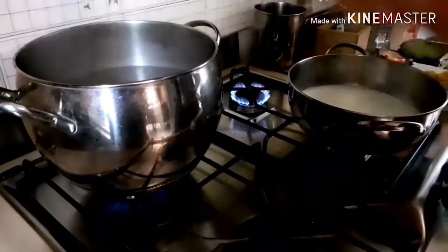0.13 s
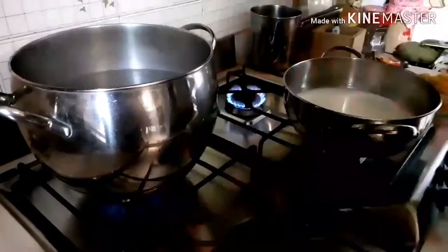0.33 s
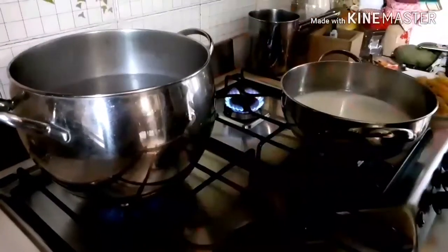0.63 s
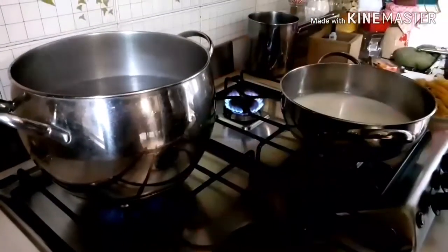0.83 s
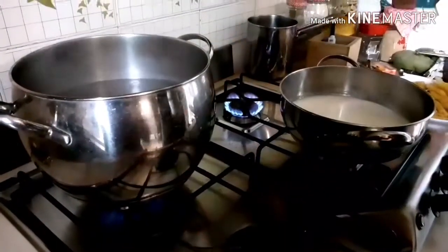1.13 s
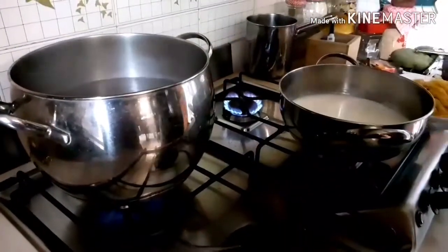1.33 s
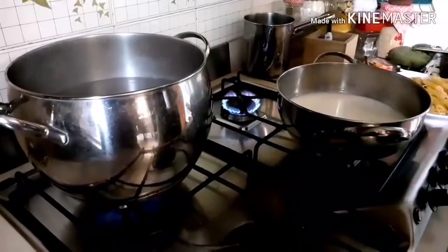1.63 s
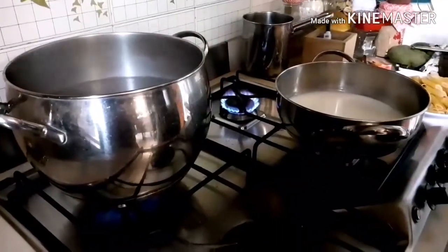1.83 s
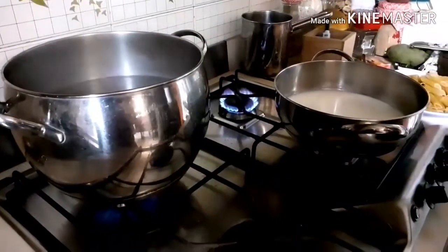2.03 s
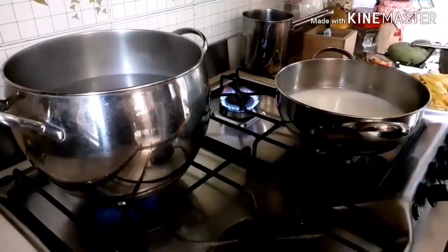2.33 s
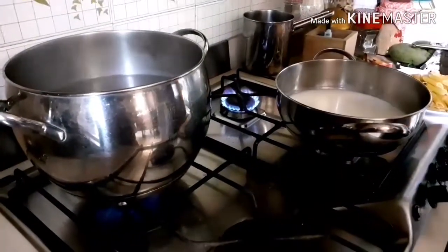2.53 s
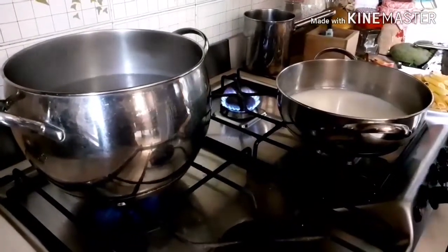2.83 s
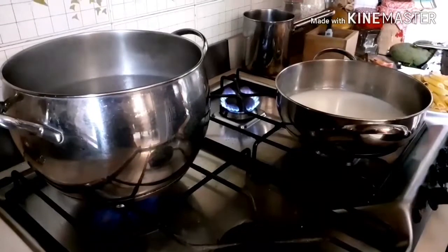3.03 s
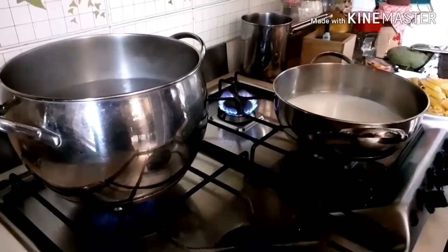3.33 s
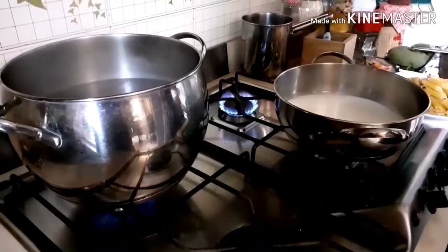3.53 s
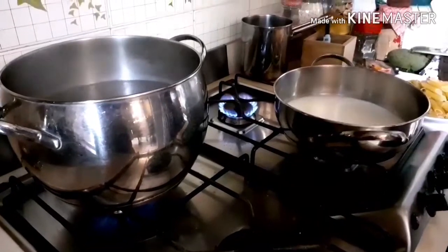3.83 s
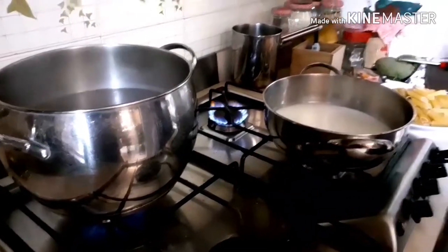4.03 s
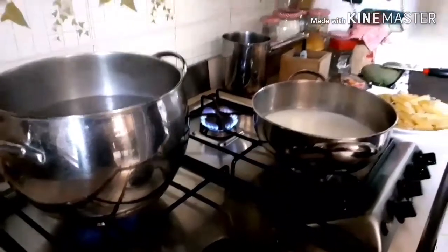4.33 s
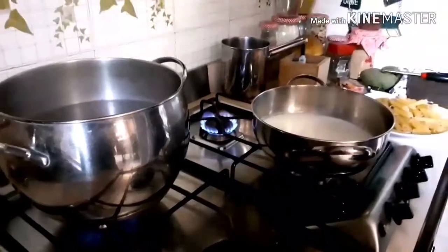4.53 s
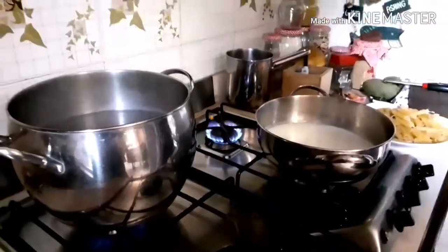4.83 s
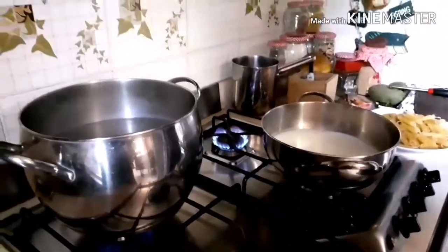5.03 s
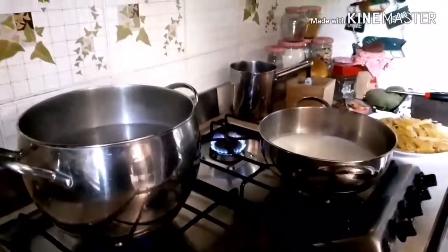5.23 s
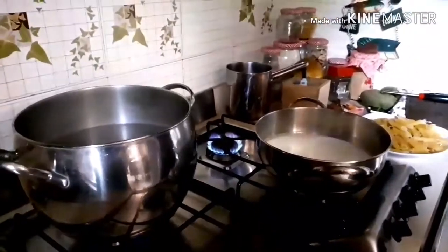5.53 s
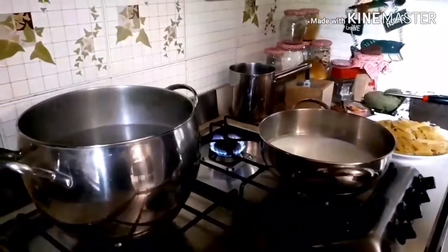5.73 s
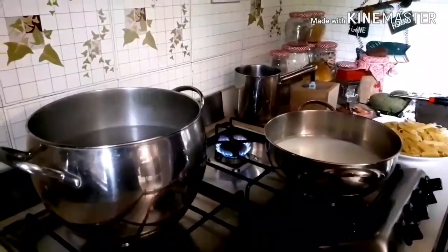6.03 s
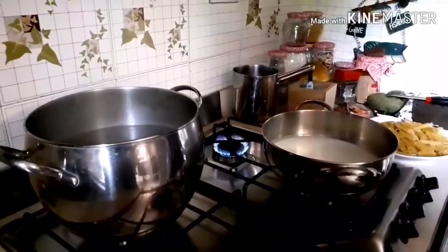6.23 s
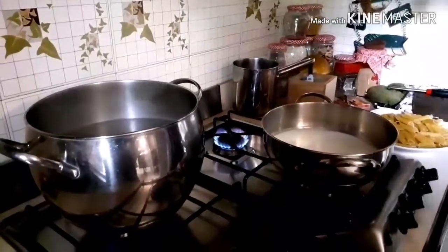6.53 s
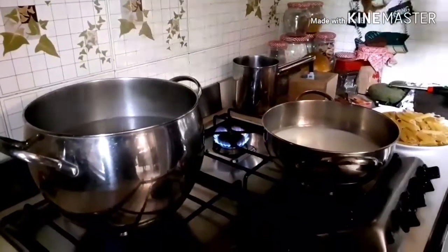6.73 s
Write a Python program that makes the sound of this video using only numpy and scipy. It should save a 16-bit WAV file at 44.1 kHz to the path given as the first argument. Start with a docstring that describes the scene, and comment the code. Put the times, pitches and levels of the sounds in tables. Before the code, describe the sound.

Gas burners softly rumble and hiss in a small kitchen, with sharp metal pot knocks, brief scrapes and dull cupboard thuds.

```python
"""A steel pot on a kitchen worktop, knocked by a utensil: each blow rings its modes over a dry clack.
A cupboard thuds, something slides briefly with gritty friction, and there is one small click.
Gas burners rumble and hiss throughout, once with a faint whistle. The small tiled room reflects
the knocks and slides; two close microphone ports hear it all."""
import sys
import numpy as np
from scipy import signal
from scipy.fft import rfft, irfft, next_fast_len
from scipy.io import wavfile
from scipy.ndimage import uniform_filter1d, map_coordinates

SR = 44100
rng = np.random.default_rng(int(sys.argv[2]) if len(sys.argv) > 2 else 0)


def log_audio(samples):
    """Write samples as a 16-bit WAV file to the path given in sys.argv[1]."""
    # one column per channel
    frames = np.atleast_2d(samples).T
    # limit to full scale, then quantise
    limited = np.clip(frames, -1, 1)
    pcm = np.round(limited * 32767).astype(np.int16)
    wavfile.write(sys.argv[1], SR, pcm)


N = 303182

# Utensil blows: (time [s], base [dB], wall [dB], rim [dB], shoulder [dB], lip [dB], handle [dB],
# contact [ms], damping [x], left minus right [dB])
POT_BLOWS = [(1.901, -31, -42.5, -23.5, -81, -83, -83, 0.62, 71, -1),
             (2.166, -56, -73, -22, -42, -43, -46, 2, 0.57, -6.5),
             (2.176, -53, -79, -28.5, -37, -44, -37, 3.2, 1.3, 16),
             (2.181, -30, -20.5, -50, -33, -52, -36, 2.2, 2.3, -3),
             (2.583, -29.5, -23, -31, -26.5, -28.5, -28, 1.02, 1.15, -2),
             (2.596, -20.5, -29, -22, -44, -46, -42, 3.4, 6.4, 6),
             (2.695, -27.5, -40, -29, -30, -34, -36, 1.4, 10.6, 0),
             (2.71, -36, -39, -38, -40, -38, -45, 1.4, 3.9, 1),
             (3.457, -50.5, -56, -52, -56, -62, -68, 0.82, 3.3, -1),
             (3.731, -29, -25, -43, -58, -69, -73, 3, 6, -1),
             (3.748, -38, -47, -61, -66, -70, -77, 1.4, 5.1, -1),
             (3.852, -51, -35, -29, -24, -24.5, -37, 1.1, 3.2, 1.5),
             (3.890, -22, -22.5, -22.5, -26.5, -21, -37, 2.1, 1.4, 0),
             (3.893, -11.5, -31.5, -13.5, -42, -27, -21, 5, 4.8, -0.5),
             (3.9038, -21.5, -47, -42, -50, -45, -55, 3.2, 1.9, 1.5),
             (3.965, -32, -65, -71, -68, -66, -70, 3.7, 1.9, 4),
             (3.982, -28.5, -58, -69, -73, -70, -68, 3, 2.2, 2),
             (4.471, -50, -51, -41, -55, -50, -55, 4, 1.6, 6)]
# Where base, wall, rim, shoulder, lip and handle ring: (frequency [Hz])
POT_BANDS_HZ = [400, 700, 1850, 2800, 3700, 5600]
# Pot modes: (frequency [Hz], gain [dB], t60 [s])
POT_MODES = [(300, -8, .1), (340, -8, .15), (370, 1, .35), (390, 0, .12), (430, -7, .25), (538, -8, .2),
             (700, -4, .12), (840, -2, .2), (950, -4, .15), (1035, -4, .2), (1170, -2, .2),
             (1635, -12, .12), (1811, -2, .25), (1868, -3, .22), (2030, -14, .15), (2400, -12, .05),
             (2810, -4, .1), (3000, -6, .05), (3240, -5, .05), (3460, -6, .04), (3680, -4, .05),
             (3770, -1, .12), (3880, -4, .1), (4250, -20, .05), (4850, -18, .07), (5570, -6, .1)]


def pot():
    """A utensil rings the steel pot; the contact drains most of the ring at once."""
    return struck(POT_BLOWS, POT_MODES, POT_BANDS_HZ, left_lag_ms=0.31, scatter_db=3, tail_db=-40,
                  drain_s=0.0093, clack_db=-10, clack_t60_s=0.059, treble_db_oct=6, bass_db_oct=22.5)


def struck(blows, modes, bands_hz, left_lag_ms, scatter_db, tail_db, drain_s,
           clack_db, clack_t60_s, treble_db_oct, bass_db_oct):
    """Each blow rings the modes, weighted by where it lands, over the clack of the surface beneath."""
    # Dents and joints split each mode into a cluster, wider in the treble.
    twins = [(f * 1.006, db - 6, t60 * 0.8) for f, db, t60 in modes]
    outer = [(f * (1 + way * f / 2e5), db - 9, t60 * .5) for f, db, t60 in modes for way in (-1, 1)]
    hz, mode_db, t60_s = np.transpose(modes + twins + outer)[:, :, None]
    # The surface has dense, dead modes that differ from spot to spot.
    dead_hz = np.geomspace(200, 14000, num=120)[:, None]
    dead_db = clack_db - treble_db_oct * np.maximum(np.log2(dead_hz / bands_hz[-1]), 0)
    dead_db -= bass_db_oct * np.maximum(np.log2(bands_hz[1] / dead_hz), 0)
    dead_t60_s = clack_t60_s * (1000 / dead_hz) ** 0.55
    t = np.arange(SR // 5) / SR
    side = np.array([1, -1])[:, None, None]

    def port_phase(f):
        """A plain lag in the bass; ports under a third of a turn apart in the treble."""
        return -side * .3 * np.pi * np.tanh(f * left_lag_ms / 300)

    def band_gain(f, band_db):
        return np.interp(np.log(f), np.log(bands_hz), band_db)

    out = np.zeros((2, N + SR))
    for start_s, *band_db, contact_ms, damping, pan_db in blows:
        draws = rng.standard_normal((4, len(dead_hz), 1))
        scatter, phase, _, detune = draws[:, :len(hz)]
        dead_phase, dead_detune = draws[2:]
        blow_hz = hz * (1 + (.0015 + hz / 2e6) * detune)
        blow_db = mode_db + band_gain(hz, band_db) + scatter_db * scatter
        phase = np.minimum(hz / 1200, 1) * phase  # low modes start in step with the push
        sound = ring(blow_hz, blow_db, t60_s / max(damping, .5), phase + port_phase(hz), len(t))
        # The contact drains the ring to a quieter tail.
        sound *= undb(tail_db) + (1 - undb(tail_db)) * np.exp(-(t / drain_s) ** 2 / contact_ms)
        clack = ring(dead_hz * (1 + 0.0394 * dead_detune), dead_db + band_gain(dead_hz, band_db),
                     dead_t60_s, 2 * dead_phase + port_phase(dead_hz), SR // 6)
        sound[:, :SR // 6] += clack
        push = 1 - np.exp(-1000 * t / contact_ms)
        at = int(start_s * SR)
        out[:, at:at + len(t)] += undb(side[:, 0] * pan_db / 2) * push * sound
    return out[:, :N]


def ring(hz, db, t60_s, phase, size):
    """Decaying sines summed over the modes; one row of phases per port."""
    step = np.exp((2j * np.pi * hz - np.log(1000) / t60_s) / SR)
    onset = (undb(db) * np.exp(1j * phase))[..., 0]
    return (onset @ np.cumprod(np.repeat(step, size, axis=1), axis=1)).imag


# Cupboard blows: (time [s], boom [dB], panel [dB], knock [dB], edge [dB], contact [ms], damping [x],
# left minus right [dB])
CUPBOARD_BLOWS = [(.476, -48, -42.5, -52, -46, 2.2, 1.9, 5), (.656, -35, -23.5, -27, -37, 13, 1.17, 1.5),
                  (.77, -74, -33, -63, -49, 3.7, 1.8, 1), (4.462, -54, -24.5, -70, -63, 15, 0.27, 0),
                  (4.485, -57, -24.5, -59, -43, 4.8, 0.83, 0), (5.351, -34, -25, -29.5, -36, 5.6, 1.6, 3.5),
                  (5.36, -14.5, -26, -40, -34.5, 4.6, 0.45, 2), (5.402, -34, -38, -23, -35, 1.4, 3, 2),
                  (5.406, -44, -11, -27.5, -34.5, 3.9, 0.54, 2.5),
                  (5.4152, -38, -16.5, -32.5, -35, 2.7, 2, 0), (5.438, -16.5, -36, -37, -52, 3, 0.92, 1),
                  (5.459, -47, -31, -42, -45, 2.8, 2.2, 2), (5.51, -28.5, -37, -55, -47, 2.5, 0.6, 3),
                  (5.742, -23, -36, -22, -38, 2.2, 3, 1), (5.748, -16.5, -16.5, -30, -38.5, 1.25, 3.1, 1.5),
                  (5.76, -18.5, -41, -29, -54, 5.1, 2, 1.5), (5.788, -24, -32, -39, -57, 3.6, 2, 5),
                  (5.811, -28, -26.5, -44, -49, 2, 1.8, 2), (5.845, -35, -25.5, -44, -49, 1.3, 1.3, 1),
                  (6.074, -29.5, -33, -46, -71, 2.9, 1.4, 1), (6.11, -35, -42, -59, -50, 2.1, 0.62, 5)]
# Where boom, panel, knock and edge ring: (frequency [Hz])
CUPBOARD_BANDS_HZ = [130, 310, 700, 2000]
# Cupboard modes: (frequency [Hz], gain [dB], t60 [s])
CUPBOARD_MODES = [(107.9, -5.5, 0.4), (160.4, -4.5, 0.15), (185, -3, 0.3), (297, -10, 0.26),
                  (226, -18, 0.12), (329.8, -2, 0.15), (350, -8, 0.053), (390, -12, 0.1), (422, -8, 0.05),
                  (502, 5, 0.068), (623, -2.5, 0.049), (674, -6, 0.056), (789, 2.5, 0.14), (843, -7, 0.082),
                  (1030, -17, 0.042), (1350, -16, 0.028)]


def cupboard():
    """Blows ring the cupboard's low modes as thuds."""
    return struck(CUPBOARD_BLOWS, CUPBOARD_MODES, CUPBOARD_BANDS_HZ, left_lag_ms=-0.28, scatter_db=1,
                  tail_db=-20, drain_s=0.0041,
                  clack_db=-11, clack_t60_s=0.1, treble_db_oct=5.5, bass_db_oct=4.5)


# Slides on the worktop: (time of full speed [s], swell [dB/s], hold [s], hiss [dB], drag [dB])
SLIDE_MOVES = [(1.902, 4000, 0.067, -40.5, -57), (3.209, 205, 0.038, -52, -39.5)]
# Friction hiss: (frequency [Hz], relative density [dB])
SLIDE_SPECTRUM = [(350, -16), (600, -1), (1480, -5.5), (1670, -4.5), (3040, -6.5), (4160, -7), (5610, -10),
                  (7780, -7.5), (10400, -12), (15600, -8)]
# Pot resonances woken by the drag: (centre [Hz], width [Hz], gain [dB])
DRAG_PEAKS = [(392, 190, 5), (1880, 350, -15.5)]


def slides(fade_db_per_s=600):
    """Gritty friction, a bright hiss over a dull drag; each slide swells, holds and fades."""
    t = np.arange(N) / SR
    grit = undb(2.5 * walk(200))
    hiss = level(shape(diffuse(N) * grit, colour(SLIDE_SPECTRUM)), 0)
    friction = rng.standard_normal(N) * grit
    drag = level(sum(undb(db) * shape(friction, peak(hz, width)) for hz, width, db in DRAG_PEAKS), 0)
    out = 0
    for full_s, swell_db_per_s, hold_s, hiss_db, drag_db in SLIDE_MOVES:
        swell_db = -swell_db_per_s * np.maximum(full_s - t, 0)
        fade_db = -fade_db_per_s * np.maximum(t - full_s - hold_s, 0)
        out += undb(swell_db + fade_db) * (undb(hiss_db) * hiss + undb(drag_db) * drag)
    return out


# Dry click: (onset level [dB], centre [Hz], width [Hz], decay [ms])
CLICK_BURST = (-34, 10491, 6999, 2.5)


def click(start_s=.4765):
    """A tiny burst of treble noise."""
    db, hz, width_hz, decay_ms = CLICK_BURST
    t = np.arange(SR // 10) / SR
    out, at = np.zeros((2, N)), int(start_s * SR)
    out[:, at:at + len(t)] = noise(peak(hz, width_hz), db, len(t)) * np.exp(-1000 * t / decay_ms)
    return out


# Background level, swelling slightly after louder knocks: (time [s], rumble level [dB])
BACKGROUND_LEVELS = [(0.0, -46.5), (0.38, -51), (0.8, -46), (1.78, -50), (2.16, -49), (3.08, -51), (3.94, -50.5),
                     (5.19, -52), (5.57, -48), (6.2, -49), (6.87, -53)]


def burners():
    """Gas burners: rumble, hum, hiss and jets all follow one background level."""
    flame_db, = curve(BACKGROUND_LEVELS)
    swing_db = flame_db - flame_db.mean()
    return (rumble(flame_db) + hum(swing_db)) * pan(1) + flame_hiss(swing_db) + jets(swing_db)


# Flame rumble: (frequency [Hz], relative density [dB])
RUMBLE_SPECTRUM = [(18, -25), (30, 1), (52, -0.5), (86, 6.5), (111, 5), (150, -9.5), (183, 7), (211, -2.5),
                   (301, 1.5), (372, -4), (900, -18.5), (1170, -48), (1980, -120)]


def rumble(flame_db):
    """Low noise of fluttering flames."""
    return noise(colour(RUMBLE_SPECTRUM)) * undb(flame_db + 1.6 * walk(3.5))


# Room resonances: (centre [Hz], width [Hz], level at mean flame [dB])
HUM_PEAKS = [(95, 110, -61), (180.9, 16.6, -59), (316, 48, -56.5), (1211, 48, -68)]


def hum(swing_db):
    """Wavering room resonances that the flame rumble keeps alive."""
    return sum(noise(peak(hz, width), db) * undb(swing_db + 2 * walk(8)) for hz, width, db in HUM_PEAKS)


# Flame hiss: (frequency [Hz], relative density [dB])
HISS_SPECTRUM = [(350, 6.5), (600, -1.5), (874, 2), (1120, -2.5), (1230, 1), (1340, -3.5), (2020, -3),
                 (2290, -6), (6410, -4), (7700, -8.5), (9000, -5.5), (10200, -15.5), (12000, -23),
                 (15600, -50), (22000, -120)]


def flame_hiss(swing_db, mean_db=-54, flicker_db=.7, split_hz=5000):
    """Smooth hiss of the flames; its dull and bright halves flicker separately."""
    hiss = noise(colour(HISS_SPECTRUM))
    dull = signal.sosfiltfilt(signal.butter(2, split_hz, fs=SR, output="sos"), hiss)
    bright = hiss - dull
    flickering = dull * undb(flicker_db * walk(18)) + bright * undb(flicker_db * walk(30))
    return undb(mean_db + .5 * swing_db) * flickering


# Gas jet hiss: (frequency [Hz], relative density [dB])
JET_SPECTRUM = [(6470, -25), (11000, -3), (11500, 2), (12800, 5), (14400, 12.5), (15200, 9.5), (15800, 14)]
# Bounce off the stove top, shortening as the ports move: (time [s], delay [ms])
JET_BOUNCE_DELAYS = [(0, 1.379), (4.0, 1.379), (5.2, 1.356), (6.87, 1.356)]


def jets(swing_db, mean_db=-57, rise_db_per_s=0.23, bounce_db=-9):
    """Thin hiss of the gas jets off to the left, plus its bounce off the stove top."""
    turn_db = rise_db_per_s * (np.arange(N) - N / 2) / SR  # the ports turn towards the jets
    direct = rng.standard_normal(N)
    direct = np.array([direct, np.roll(direct, 1)])  # a sample later at the far port
    hiss = level(shape(diffuse(N) + 0.26 * direct, colour(JET_SPECTRUM)), mean_db)
    hiss *= undb(0.52 * swing_db + turn_db + 0.48 * walk(3.9)) * pan(7)
    delay_ms, = curve(JET_BOUNCE_DELAYS)
    earlier = np.arange(N) - delay_ms * SR / 1000
    bounce = np.array([map_coordinates(port, [earlier], mode="mirror") for port in hiss])
    return hiss + undb(bounce_db) * bounce


# Burner whistle: (time [s], pitch [Hz], level [dB])
WHISTLE_PATH = [(.86, 1820, -90), (.92, 1860, -71), (1.03, 2070, -68), (1.12, 2010, -70), (1.22, 1980, -72),
                (1.28, 1960, -90)]


def whistle():
    """A thin, unsteady tone that rises and sags, barely above the hiss."""
    hz, db = curve(WHISTLE_PATH)
    amplitude = undb(db + 5 * walk(40))
    wavering_hz = hz * (1 + .012 * walk(80))
    return amplitude * np.sin(2 * np.pi * np.cumsum(wavering_hz) / SR)


# Reverberation bands: (centre [Hz], t60 [s], gain [dB])
ROOM_BANDS = [(109, 0.66, -4), (337, 0.47, -9), (638, 0.4, -3.5), (1480, 0.44, -4), (3450, 0.42, -2),
              (9000, 0.34, 2.5)]


def room(dry, gap_ms=4):
    """Dense reflections from tiles and cupboards; each band dies at its own rate."""
    t = np.arange(SR // 2) / SR
    onset = np.clip(1000 * t / gap_ms - .5, 0, 1)
    reflections, response = diffuse(len(t)), 0
    for hz, t60_s, db in ROOM_BANDS:
        fade = onset * np.exp(-np.log(1000) * t / t60_s)
        band = shape(reflections, lambda f: np.exp(-(np.log2(f / hz) / 0.7) ** 2))
        response += undb(db) * band * fade / np.sqrt(np.sum(fade ** 2))
    return signal.fftconvolve(response, dry.mean(axis=0, keepdims=True))[:, :N]


def diffuse(size, alike_hz=570):
    """Stereo noise, alike in the bass and unrelated in the treble."""
    mid, side = rng.standard_normal((2, size))
    side = shape(side, lambda f: 1 / np.sqrt(1 + (alike_hz / f) ** 2))
    mid = shape(mid, lambda f: np.sqrt(1 + 1 / (1 + (f / alike_hz) ** 2)))
    return np.array([mid + side, mid - side]) / np.sqrt(2)


def noise(gain, rms_db=0, size=N):
    """Filtered diffuse noise."""
    return level(shape(diffuse(size), gain), rms_db)


def walk(rate_hz):
    """Random steps, smoothed twice."""
    hold = int(SR / rate_hz)
    steps = np.repeat(rng.standard_normal(N // hold + 1), hold)
    return uniform_filter1d(uniform_filter1d(steps, hold), hold)[:N]


def shape(x, gain):
    """Filter by a gain given as a function of frequency."""
    size = next_fast_len(x.shape[-1])
    hz = np.maximum(np.fft.rfftfreq(size, 1 / SR), 1)
    return irfft(rfft(x, size) * gain(hz), size)[..., :x.shape[-1]]


def colour(spectrum):
    hz, db = np.transpose(spectrum)
    return lambda f: undb(np.interp(np.log(f), np.log(hz), db, left=-99, right=-99))


def peak(hz, width_hz):
    return lambda f: 1 / (1 + ((f - hz) / width_hz * 2) ** 2)


def curve(table):
    """Columns of a timed table, interpolated per sample."""
    times_s, *columns = np.transpose(table)
    return [np.interp(np.arange(N) / SR, times_s, column) for column in columns]


def pan(left_minus_right_db):
    return undb(left_minus_right_db * np.array([[.5], [-.5]]))


def level(x, rms_db):
    return x * undb(rms_db) / np.sqrt(np.mean(x ** 2))


def undb(db):
    return 10 ** (np.asarray(db) / 20)


def scene():
    """Knocks and slides with their reflections, over the burners."""
    handling = pot() + cupboard() + slides()
    return handling + room(handling) + burners() + whistle() + click()


def record(dry, low_hz=62, top_hz=15650):
    """The small microphones lose the deepest bass; a steep low-pass cuts the top."""
    thin = signal.sosfilt(signal.butter(4, low_hz, "high", fs=SR, output="sos"), dry)
    return signal.sosfilt(signal.ellip(10, .2, 70, top_hz, fs=SR, output="sos"), thin)


dry = scene()
out = record(dry)
log_audio(out)
```